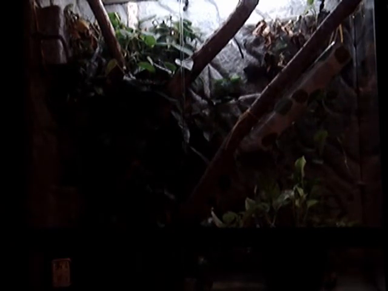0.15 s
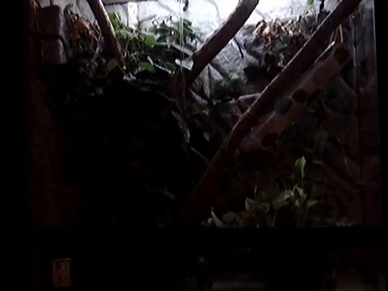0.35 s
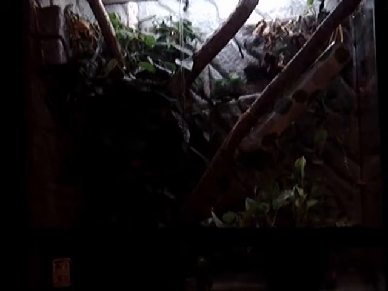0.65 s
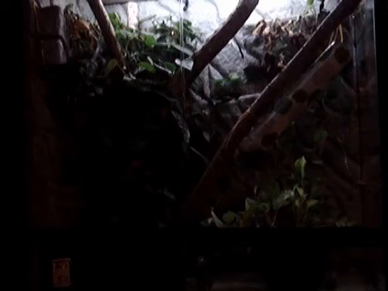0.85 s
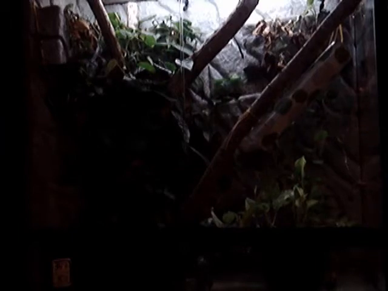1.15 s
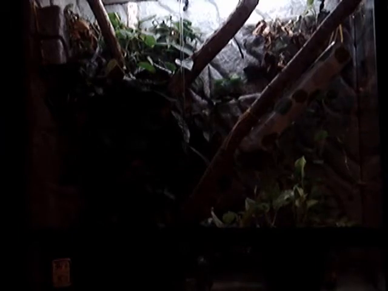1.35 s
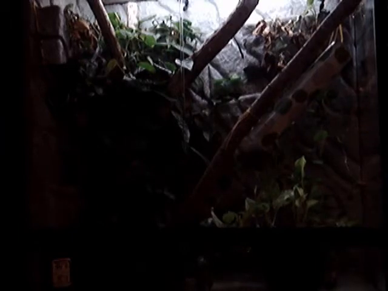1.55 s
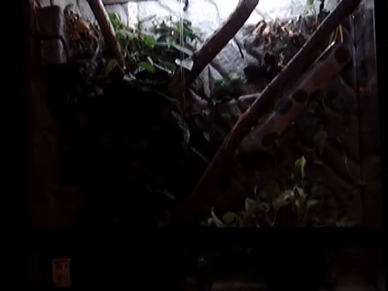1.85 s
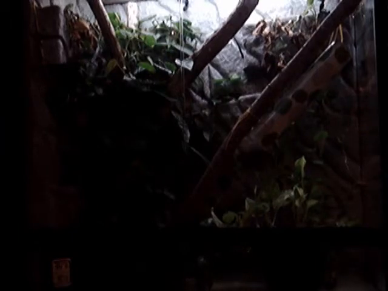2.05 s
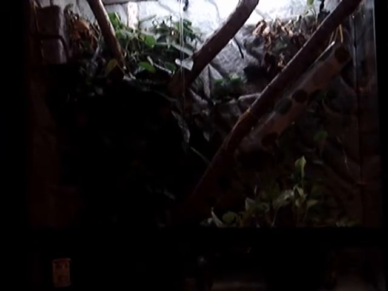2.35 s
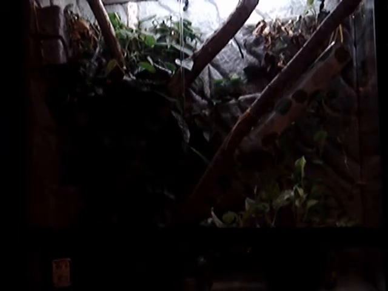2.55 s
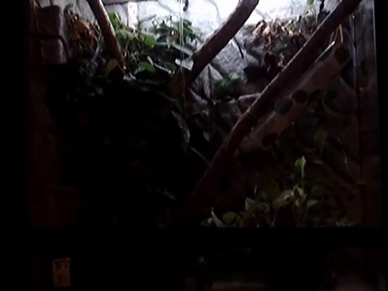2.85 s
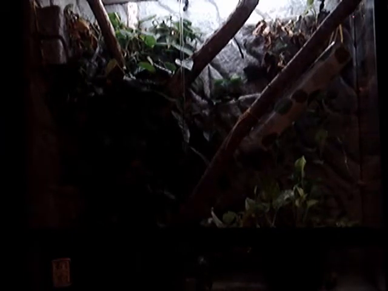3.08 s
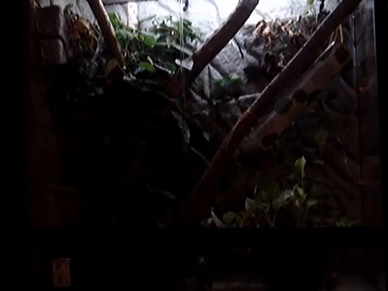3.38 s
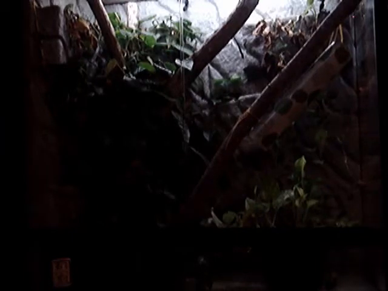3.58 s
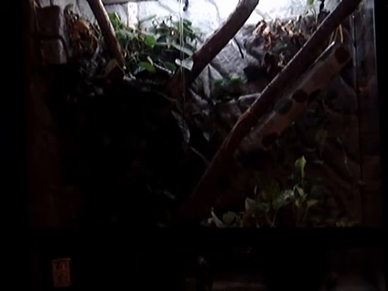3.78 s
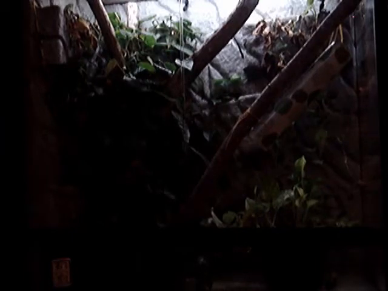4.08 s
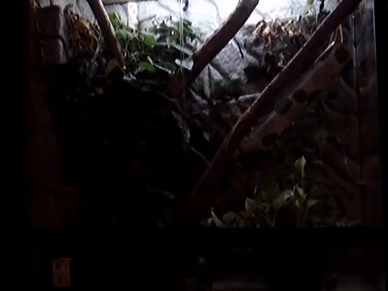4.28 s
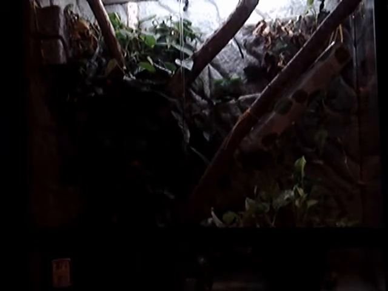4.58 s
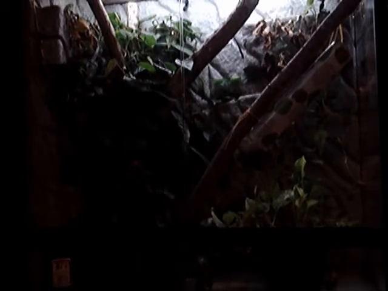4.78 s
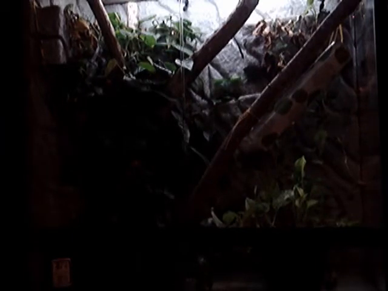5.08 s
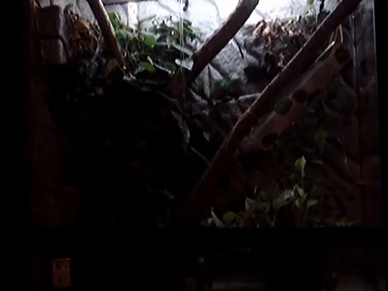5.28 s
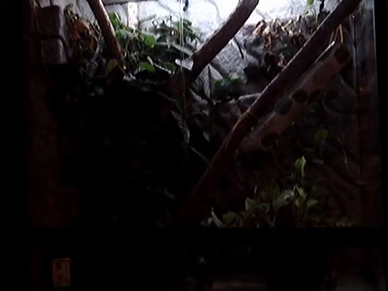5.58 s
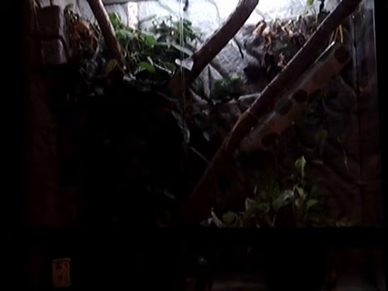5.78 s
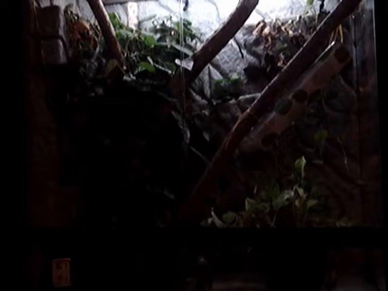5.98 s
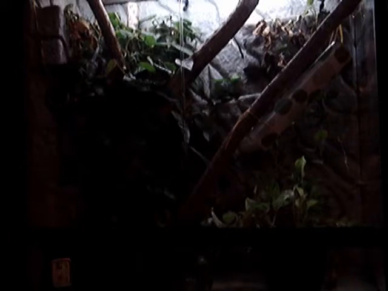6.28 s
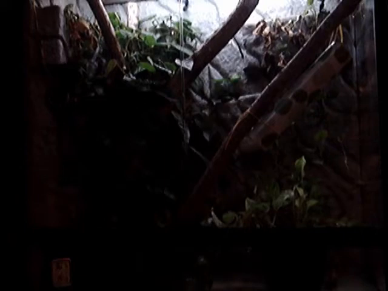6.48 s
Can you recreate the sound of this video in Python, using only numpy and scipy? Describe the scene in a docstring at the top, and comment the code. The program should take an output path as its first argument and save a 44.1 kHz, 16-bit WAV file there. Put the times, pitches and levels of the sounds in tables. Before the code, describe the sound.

A faint, high, raspy trill comes first, dotted with small chirps above quiet room noise. Close by, a tokay gecko gives three loud, evenly spaced calls. Each is a clipped, hollow yelp followed by a deeper throaty note that breaks into separate weakening pulses, slightly lower every time. Glass resonance and a short indoor echo follow; after the last rattle only the hush and trill remain.

```python
"""A thin insect-like trill wandering near 5 kHz is heard first, over a soft hush with faint whines.
A tokay gecko then calls three times from a glass terrarium in a quiet room at night: a short high bark
("to"), then a lower note ("kay") that slows into a rattle of single pulses.
Vocal-fold snaps and puffs of air excite throat and mouth resonances; glass and room ring after them.
The trill and the hush are shaped noise; the chirps and the whines are sines of wavering phase."""
import sys
import numpy as np
from scipy import signal
from scipy.fft import rfft, irfft
from scipy.io import wavfile
from scipy.ndimage import uniform_filter1d, minimum_filter1d

SR = 44100
rng = np.random.default_rng(int(sys.argv[2]) if len(sys.argv) > 2 else 0)


def put_to_file(sound):
    """Save the sound as 16-bit audio at rate SR, in the file named by the first command-line argument."""
    columns = np.atleast_2d(sound).T  # one column per channel
    safe = np.clip(columns, -1, 1)
    whole_steps = np.round(safe * 32767)
    wavfile.write(sys.argv[1], SR, whole_steps.astype(np.int16))


N = 292824

# Barks: (start [s], tense time [s], length [s], settled pitch [Hz], relative level [dB])
BARK_CALLS = [(0.607, 0.045, 0.093, 424.3, .5), (2.688, 0.043, 0.1, 416.1, -2),
              (4.748, .038, .105, 410.6, 0)]
# Long notes: (start [s], held time [s], held pitch [Hz], rattle length [s], last pulse rate [1/s],
# bend of the slowing [1 = even], relative level [dB], edge while held [dB])
LONG_NOTES = [(.862, 0.069, 293.7, .37, 38.01, 0.96, -0.37, 5.5),
              (2.938, 0.073, 280.7, .42, 38.13, 0.93, -0.16, 2.5),
              (4.998, .08, 270, .48, 35.1, .8, -0.9, 2.5)]
# Throat response: (frequency [Hz], gain when tense and fast [dB], gain in the slack rattle [dB])
THROAT_RESPONSE = [(60, -37.5, -38), (205, -32, -39.5), (290.2, -6.5, -20.5), (406, -2.5, -8), (490, 4, 2),
                   (842, -7, -9.5), (1110, -14, -24), (1934, -17, -13), (2009, 2, -4), (2342, -2, 1),
                   (2607, -10, -18.5), (3585, -29.5, -27), (7930, -47.5, -46.5), (9900, -69, -75),
                   (11000, -83.5, -72.5)]
# Standing waves of the tank: (frequency [Hz], level over the direct sound [dB], decay time t60 [s])
TANK_MODES = [(297.2, 8, 0.16), (397, 6, 0.29), (495.6, 17, 0.28), (506, 3, 0.48), (562, 9, 0.23),
              (602.2, 17.5, 0.29), (828, -5, 0.067), (1178, 11, 0.068), (1603, 21, 0.18), (2087, 12, 0.32),
              (2300, -3, 0.39), (2320, 4.5, 0.36), (2680, -3, 0.9)]
# Reflections from the glass: (delay [ms], level over the direct sound [dB])
PANE_ECHOES = [(1.3, -9), (3.7, -10), (5.6, 1), (7.9, -19), (11.3, -5.5), (15.2, -30)]
# Reverberation of the room: (frequency [Hz], decay time t60 [s])
ROOM_DECAY = [(150, 0.18), (500, 0.24), (2200, 0.24), (5000, 0.29), (10000, 0.05)]
# Course of the trill: (time [s], relative level [dB], centre pitch before swaying [Hz])
TRILL_COURSE = [(0, -35, 4850), (0.16, -35, 4780), (0.28, -46, 5100), (0.41, -38, 4850), (1.08, -38, 4875),
                (1.16, -45.2, 4770), (1.27, -37.5, 4880), (2.6, -40, 5000), (3.13, -41, 4800),
                (3.33, -36.5, 4770), (3.9, -34.5, 4830), (4.01, -47.5, 4860), (4.06, -34, 4920),
                (4.799, -39.5, 4840), (5.95, -37.5, 4920), (6.3, -38, 4760), (6.4, -48.5, 5200),
                (6.55, -34.5, 4710), (6.64, -33.5, 4900)]
# Lower half of the trill: (frequency [Hz], relative level [dB])
TRILL_LOW_BAND = [(3300, -51.5), (4250, -16.5), (4520, 0), (4800, 4), (5150, -23), (5700, -80.5)]
# Upper half of the trill: (frequency [Hz], relative level [dB])
TRILL_HIGH_BAND = [(4400, -64.5), (4800, -3.5), (5080, 3.5), (5450, -6), (5680, -14), (6300, -28),
                   (9000, -80)]
# Chirps that stand out of the trill: (start [s], length [s], relative level [dB], middle pitch [Hz])
CHIRP_EVENTS = [(1.002, 0.027, -29.5, 5100), (1.053, 0.033, -28.5, 5080), (1.371, 0.088, -34.5, 4530),
                (1.513, 0.12, -32.5, 4650), (2.074, .1, -33, 4720), (2.21, 0.029, -22.5, 5050),
                (2.261, 0.028, -25, 5100), (2.455, 0.17, -36, 4730), (3.27, 0.11, -35, 4580),
                (3.442, 0.032, -24.5, 5174), (3.807, 0.023, -22.5, 4754), (4.128, 0.026, -27, 5070),
                (4.163, 0.078, -30.5, 5080), (4.911, 0.061, -27, 4770), (4.941, 0.11, -28.5, 5040),
                (5.534, 0.11, -33, 4727), (5.8, 0.027, -23.5, 5160), (5.853, .025, -29.5, 4980),
                (5.931, 0.029, -30, 4900), (6.2, 0.052, -28, 4780), (6.252, 0.026, -27, 4770)]
# Spectrum of the room tone: (frequency [Hz], relative density [dB per Hz])
HUSH_SPECTRUM = [(38, -23), (60, -13), (130, -17.5), (165, -4), (200, -10.5), (380, -11), (490, -4),
                 (700, -13), (1130, -11.5), (1500, -16), (2030, -16), (3600, -18), (6800, -20), (8500, -25),
                 (10000, -23), (10300, -76.5)]
# Faint whines: (frequency [Hz], rms level [dB])
WHINE_TONES = [(468, -67), (576, -66), (1115, -70), (1346, -72), (2019, -69), (7860, -68.5)]

# Bark strength: when swollen; how much softer it starts; time to swell
BARK_DB, BARK_SOFT_DB, BARK_RISE_S = -5, -4, 0.0067
# Bark's break: time to slip loose; share of the pitch lost; fading from then on
BARK_SLIP_S, BARK_DROP, BARK_FADE_DB_PER_S = .014, .11, 191.5
# The bark's pitch overshoots by this share, swings with this period and settles
BARK_WOBBLE, BARK_WOBBLE_S, BARK_SETTLE_S = .045, .024, 0.023
# Edge is the weight of the treble in each snap: tense bark, loose bark
BARK_EDGE_DB, BARK_LOOSE_EDGE_DB = 7.5, -11
# Note strength while held and as the rattle starts; loss over the rattle
HELD_DB, RATTLE_DB, RATTLE_FADE_DB = -4, 0.5, 14.5
RATTLE_EDGE_DB, NOTE_SLIP_S = -4.5, .015  # edge in the rattle; time the folds take to go slack
ONSET_SHARP, ONSET_S = .06, .008  # each long note starts sharp by this share; settling time
# Mouth resonance; its rise at the widest gape; time to open or close; bandwidth
MOUTH_HZ, GAPE_HZ, GAPE_S, MOUTH_WIDTH_HZ = 2237, 370, 0.072, 260
OVERTONE_HZ = 14350  # thin ring above the voice
# Pitch at which the halves balance; shift that tips them 1 dB each way; random tipping
TRILL_HALVES_HZ, TRILL_HZ_PER_DB, TRILL_SWAY_DB = 4919, 54, 1.64
EDGE_HZ = 15000  # upper band limit


def gecko(level_db=18, split_hz=1250, rasp_db=-36, rasp_s=0.0014, push_db=-46, push_hz=125):
    """Source-filter principle: each snap lets through a puff of air, and both ring the throat."""
    barks = sum(pulses(bark(*row), clear_jitter=.024, slack_jitter=.1, slack_below_hz=395, shimmer_db=3.5)
                for row in BARK_CALLS)
    notes = sum(pulses(note(*row), clear_jitter=.008, slack_jitter=.04, slack_below_hz=260, shimmer_db=1.5)
                for row in LONG_NOTES)
    snaps = barks + notes
    airflow = signal.lfilter([1], [1, -np.exp(-1 / (rasp_s * SR))], abs(snaps))
    puffs = airflow * rng.standard_normal(N)
    drive = snaps + gain_of(rasp_db) * puffs

    # edge strengthens or weakens only the treble of the drive
    treble, throat = signal.butter(1, split_hz, "high", fs=SR), np.array(THROAT_RESPONSE)
    voice = 0
    for k, (plain, edged) in enumerate(drive):  # tense, then slack
        excitation = plain + signal.lfilter(*treble, edged - plain)
        voice = voice + colour(excitation, throat[:, [0, k + 1]])

    # the tense part carries a soft low flutter of air and a thin ring far above the voice
    low_band = signal.butter(2, [push_hz / 2, push_hz], "band", fs=SR, output="sos")
    push = gain_of(push_db) * signal.sosfilt(low_band, puffs[0, 0])
    thin_band = signal.butter(3, [OVERTONE_HZ - 120, OVERTONE_HZ + 120], "band", fs=SR, output="sos")
    ring = gain_of(-40) * signal.sosfilt(thin_band, snaps[0, 0])
    return gain_of(level_db) * (voice + mouth(notes[:, 0].sum(0)) + push + ring)


def bark(start, tense_s, length, pitch_hz, level_db):
    """Fold tension sets pitch: a tense yelp wobbles, breaks, drops and fades.

    Rows: (time [s], pulse rate [1/s], pulse strength [dB], edge [dB])."""
    t = np.arange(0, length, 1 / SR)
    loose = np.clip((t - tense_s) / BARK_SLIP_S, 0, 1)
    wobble = BARK_WOBBLE * np.exp(-t / BARK_SETTLE_S) * np.cos(2 * np.pi * t / BARK_WOBBLE_S)
    rate = pitch_hz * (1 + wobble) * (1 - BARK_DROP * loose)
    swell_db = BARK_SOFT_DB * np.exp(-t / BARK_RISE_S)
    strength_db = BARK_DB + swell_db - BARK_FADE_DB_PER_S * np.maximum(t - tense_s, 0)
    edge_db = BARK_EDGE_DB * (1 - loose) + BARK_LOOSE_EDGE_DB * loose
    return np.transpose([start + t, rate, level_db + strength_db, edge_db])


def note(start, hold, pitch_hz, rattle, last_rate, bend, level_db, edge_db):
    """Relaxation of the folds: as the air runs out, pulses grow further apart and weaker; rows as for bark."""
    t = np.arange(0, hold + rattle, 1 / SR)
    spent = np.maximum(t - hold, 0) / rattle
    slack = np.clip((t - hold) / NOTE_SLIP_S + 1, 0, 1)
    held_gap = 1 / (pitch_hz * (1 + ONSET_SHARP * np.exp(-t / ONSET_S)))
    gap = held_gap + (1 / last_rate - 1 / pitch_hz) * spent ** bend
    strength_db = HELD_DB * (1 - slack) + RATTLE_DB * slack - RATTLE_FADE_DB * spent
    edge_course_db = edge_db * (1 - slack) + RATTLE_EDGE_DB * slack
    return np.transpose([start + t, 1 / gap, level_db + strength_db, edge_course_db])


def pulses(rows, clear_jitter, slack_jitter, slack_below_hz, shimmer_db, tense_hz=240):
    """Periodic excitation by snaps of the vocal folds, more uneven once the folds go slack.

    Returns (tense, slack) x (plain, weighted by edge) x time; jitters are shares of a period."""
    s, rate, strength_db, edge_db = np.transpose(rows)
    t = np.arange(s[0], s[-1], 1 / SR)
    turns = np.cumsum(np.exp(np.interp(t, s, np.log(rate)))) / SR
    at = np.interp(np.arange(int(turns[-1]) + 1), turns, t)  # one snap per whole turn
    hz = np.interp(at, s, rate)
    slack = np.clip((1 - hz / slack_below_hz) * 10, 0, 1)
    early, louder = rng.standard_normal((200, 2))[:len(at)].T
    at = at + early * (clear_jitter + slack * slack_jitter) / np.maximum(hz, slack_below_hz / 2)
    uneven_db = shimmer_db * louder * (1 + slack / 5)  # shimmer grows by a fifth when slack
    size = gain_of(np.interp(at, s, strength_db) + uneven_db)
    tension = np.clip(hz / tense_hz, 0, 1) ** 2
    edges = gain_of(np.interp(at, s, edge_db))

    out, span = np.zeros((2, 2, N)), np.arange(-16, 17)
    for when, a, tense, edge in zip(at * SR, size, tension, edges):
        snap = a * np.sinc(span - when % 1) * np.hanning(len(span))  # lands between samples
        out[..., int(when) + span] += np.outer([tense, 1 - tense], [1, edge])[..., None] * snap
    return out


def mouth(x, level_db=-4):
    """Moving cavity resonance: as each long note breaks the jaws gape widest, and it rises and sinks."""
    t = np.arange(N) / SR
    gape = sum(np.exp(-((t - start - hold) / GAPE_S) ** 2) for start, hold, *_ in LONG_NOTES)
    turn = np.exp(2j * np.pi * np.cumsum(MOUTH_HZ + GAPE_HZ * gape) / SR)
    r = np.exp(-np.pi * MOUTH_WIDTH_HZ / SR)
    # shift the resonance to 0 Hz, smooth there, and shift back
    smooth = signal.lfilter([(1 - r) ** 2], np.poly([r, r]), gape * x / turn + 1e-18)
    return gain_of(level_db) * 2 * (turn * smooth).real


def terrarium(x, size=30000):
    """Enclosure acoustics: direct sound, quick pane reflections and exponentially damped standing waves."""
    t, response = np.arange(size) / SR, np.zeros(size)
    response[0] = 1
    for ms, db in PANE_ECHOES:
        response += gain_of(db) * np.sinc((t - ms / 1000) * SR)
    for hz, db, t60 in TANK_MODES:
        damping = np.log(1000) / t60
        decay = 2 * damping / SR * np.exp(-damping * t)
        response += gain_of(db) * decay * np.cos(2 * np.pi * hz * t)
    return signal.oaconvolve(x, response)[:N]


def room(x, delay_s=0.0028):
    """Diffuse reverberation: a dense tail whose bands each die at their own speed."""
    hz, t, z = signal.stft(rng.standard_normal(SR), SR, nperseg=256)
    decay = gain_of(-60 * t / read(ROOM_DECAY, hz)[:, None])
    tail = signal.istft(z * decay, SR, nperseg=256)[1]
    tail = tail * (1 - np.exp(-(np.arange(len(tail)) / SR / delay_s) ** 2))  # builds up after the direct sound
    return signal.fftconvolve(x, tail / np.linalg.norm(tail))[:N]


def trill(level_db=-7.0, grain_db=2.0, grain_hz=190, catch_db=-7, catch_s=0.0085, sharp_s=.028):
    """Amplitude-modulated band noise: its halves trade weight as pitch wanders; it dips before sharp chirps."""
    s, db, hz = np.transpose(TRILL_COURSE)
    t = np.arange(N) / SR
    catches = sum(np.exp(-((t - start + catch_s) / catch_s) ** 2)
                  for start, length, *_ in CHIRP_EVENTS if length < sharp_s)
    flutter_db = drift(55) + grain_db * drift(grain_hz) + catch_db * catches
    pitch_tip_db = (np.interp(t, s, hz) - TRILL_HALVES_HZ) / TRILL_HZ_PER_DB
    tip_db = pitch_tip_db + TRILL_SWAY_DB * drift(12)
    course_db = level_db + np.interp(t, s, db) + flutter_db
    low = noise(TRILL_LOW_BAND) * gain_of(course_db - tip_db)
    high = noise(TRILL_HIGH_BAND) * gain_of(course_db + tip_db)
    return low + high


def chirps(fall_hz=80, waver_hz=90, pure_s=.02, rise_share=0.15, grain_db=2.5, level_db=0.0):
    """Frequency modulation: quick notes slide down a little, nearly pure if short, raspier if longer."""
    out, waver, grain = np.zeros(N), waver_hz * drift(280), gain_of(grain_db * drift(170))
    for s, length, db, hz in CHIRP_EVENTS:
        u = np.linspace(0, 1, int(length * SR))
        rasp = np.sqrt(length / pure_s) * waver[int(s * SR):][:len(u)]  # waver_hz applies at length pure_s
        pitch = hz + fall_hz * (.5 - u) + rasp
        swell = (1 - np.exp(-(u / rise_share) ** 2)) * (1 - u ** 2) ** 2
        add(out, s, gain_of(db + level_db) * swell * np.sin(2 * np.pi * np.cumsum(pitch) / SR))
    return out * grain


def room_tone(level_db=-52, apart_db=-26, waver=0.95):
    """Stationary noise: a soft hush, slightly unlike in the two channels, with phase-wavering whines."""
    t, side = np.arange(N) / SR, gain_of(apart_db) * noise(HUSH_SPECTRUM)
    whines = sum(gain_of(db) * np.sqrt(2) * np.sin(2 * np.pi * f * t + waver * drift(4))
                 for f, db in WHINE_TONES)
    return gain_of(level_db) * (noise(HUSH_SPECTRUM) + np.array([side, -side])) + whines


def noise(points):
    """Spectral shaping: white noise given the table's spectrum, at rms 1."""
    gain = gain_of(read(points, np.fft.rfftfreq(N, 1 / SR)))
    return evened(irfft(rfft(rng.standard_normal(N)) * gain, N))


def drift(rate_hz):
    """Low-pass random modulation: smooth chance of rms 1 with a Gaussian spectrum of this width."""
    hz = np.fft.rfftfreq(N, 1 / SR)
    return evened(irfft(rfft(rng.standard_normal(N)) * np.exp(-(hz / rate_hz) ** 2), N))


def colour(x, points, size=4096):
    """Minimum-phase filtering: a causal response with the given spectrum rings after each click."""
    log_gain = np.log(gain_of(read(points, abs(np.fft.fftfreq(size, 1 / SR)))))
    ring = np.fft.ifft(np.exp(np.conj(signal.hilbert(log_gain)))).real
    return signal.oaconvolve(x, ring)[:N]


def placed(x, right_db, above_hz=900):
    """Level difference between two close microphones: only the treble is louder on the right."""
    treble = signal.sosfiltfilt(signal.butter(2, above_hz, "high", fs=SR, output="sos"), x)
    return x + treble * (gain_of([[-right_db / 2], [right_db / 2]]) - 1)


def read(points, hz):
    """Interpolation of a spectrum table along log frequency."""
    f, value = np.transpose(points)
    return np.interp(np.log(hz + 1), np.log(f + 1), value)


def gain_of(db):
    """Decibel law: level to amplitude gain."""
    return 10 ** (np.asarray(db) / 20)


def evened(x):
    """Power normalisation to rms 1."""
    return x / np.sqrt(np.mean(x ** 2) + 1e-20)


def add(mix, s, sound):
    """Superposition: adds a sound to the mix at time s."""
    part = mix[max(round(s * SR), 0):][:len(sound)]
    part += sound[:len(part)]


def scene(wet_db=-1):
    """Superposition of the gecko in its tank, the trill with its chirps, and the quiet room."""
    call = gecko()
    voice = terrarium(call) + gain_of(wet_db) * room(call)
    insects = trill() + chirps()
    return placed(voice, right_db=1.42) + placed(insects, right_db=.5) + room_tone()


def record(dry, limit_db=-10.0, envelope_fall_db_per_s=120):
    """Compression: power and peaks above the limit lose 85 % of their excess dB; then a band limit."""
    power = (dry ** 2).mean(0)
    peaks = -minimum_filter1d(-power, size=300) / 7  # running maximum
    power_db = 10 * np.log10(np.maximum(uniform_filter1d(power, size=300), peaks) + 1e-12)
    fall = np.arange(N) * envelope_fall_db_per_s / SR
    envelope_db = np.maximum.accumulate(power_db + fall) - fall  # rises at once, falls steadily
    over_db = np.maximum(envelope_db - limit_db, 0)
    held = dry / gain_of(.85 * uniform_filter1d(over_db, size=150))
    band_limit = signal.firwin(511, EDGE_HZ, window=("kaiser", 9), fs=SR)
    return signal.oaconvolve(held, band_limit[None], "same")


dry = scene()
out = record(dry)
put_to_file(out)
```